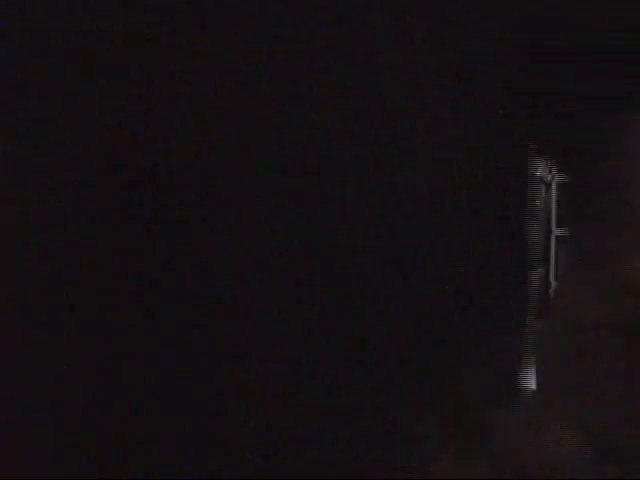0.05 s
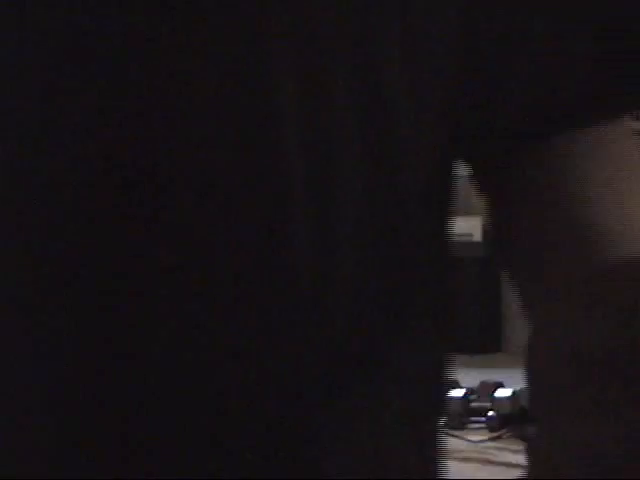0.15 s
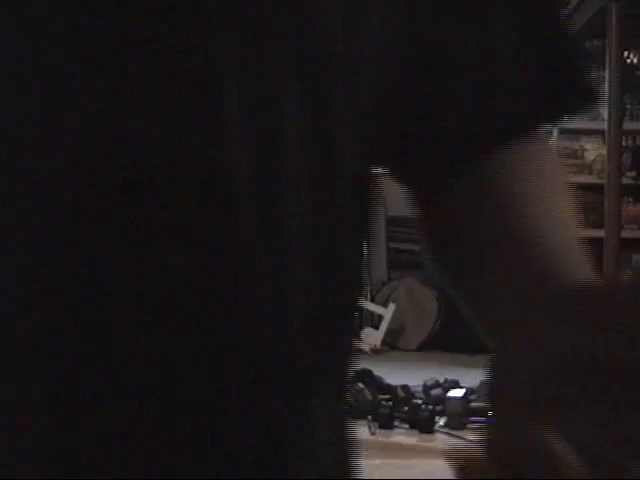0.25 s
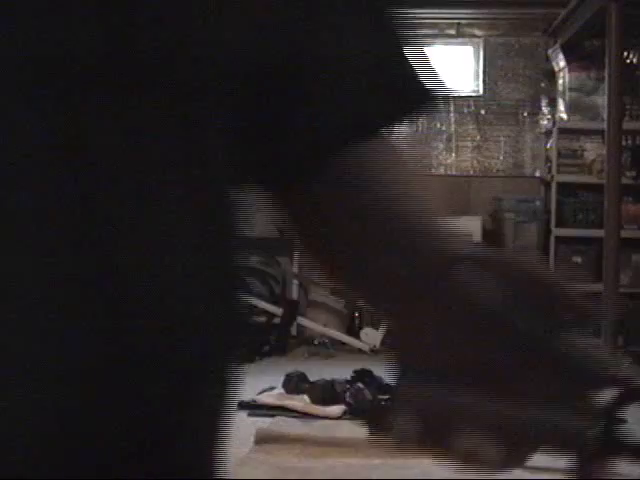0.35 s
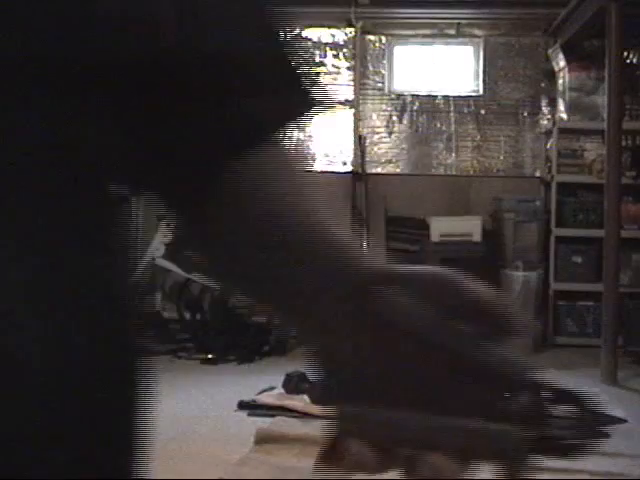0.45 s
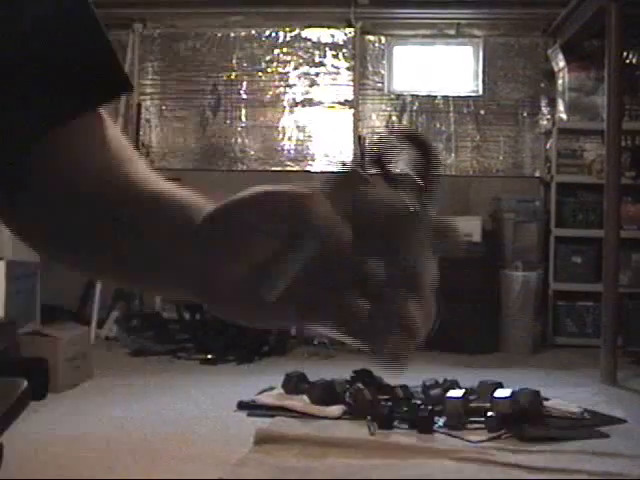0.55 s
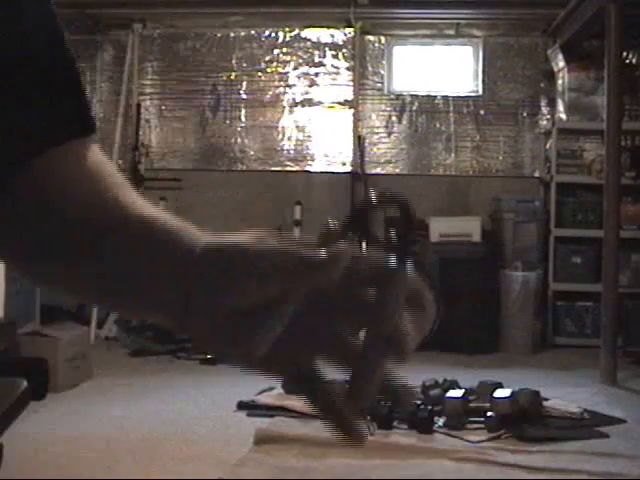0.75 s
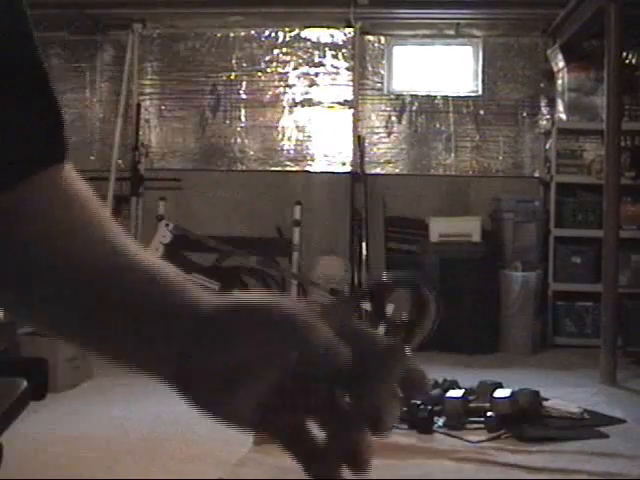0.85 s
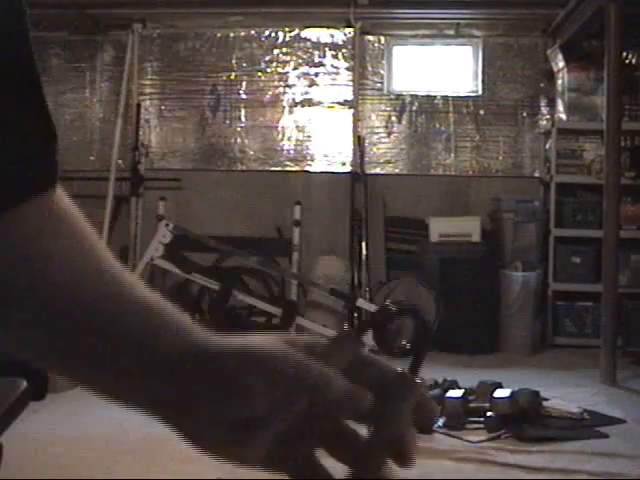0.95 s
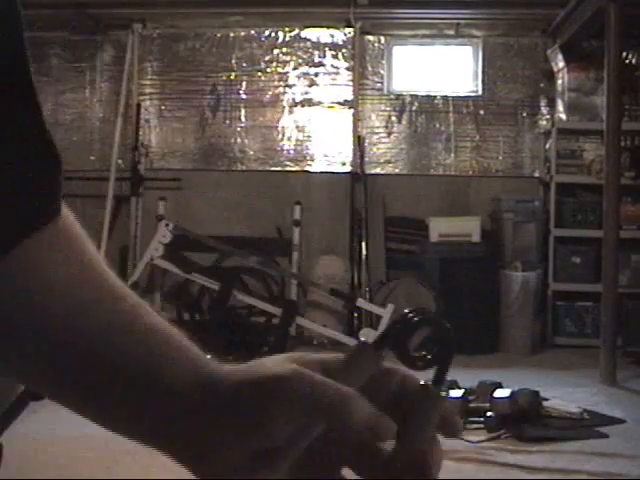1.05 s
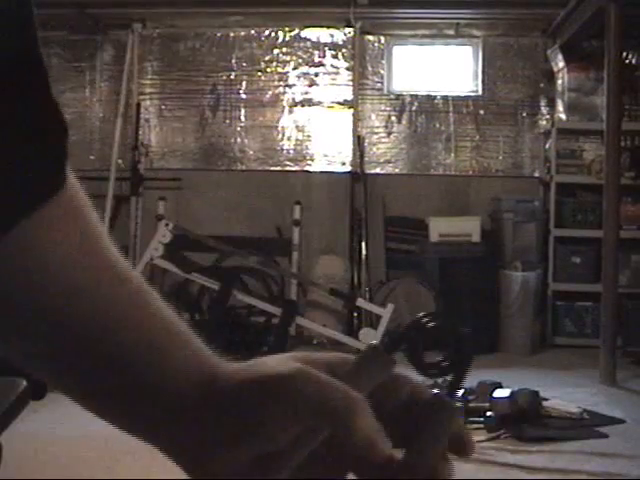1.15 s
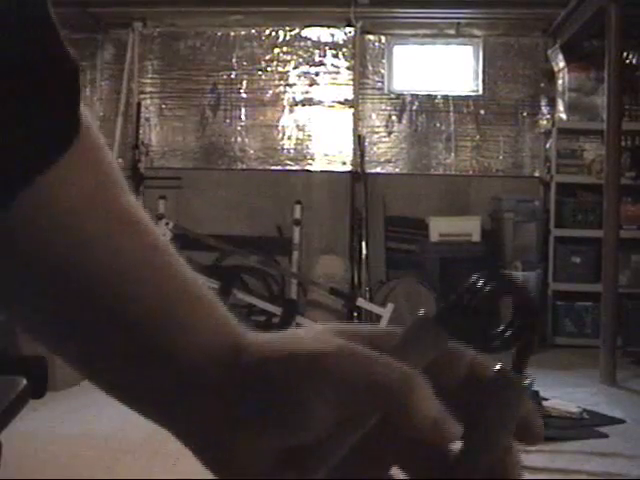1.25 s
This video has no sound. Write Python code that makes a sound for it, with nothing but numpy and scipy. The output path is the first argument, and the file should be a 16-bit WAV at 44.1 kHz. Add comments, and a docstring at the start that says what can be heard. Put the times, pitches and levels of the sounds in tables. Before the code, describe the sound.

A camera body is bumped twice right at the microphone at about 0.2 seconds, a light knock followed at once by a heavier one. Each is a hollow thud with a short clatter, dying quickly in a quiet basement. Around 1.2 to 1.3 seconds a hand rubs softly on a hand gripper, which ticks and snaps faintly. Soft hiss, electrical hum and a thin motor whine continue throughout.

```python
"""Mains hum, a thin motor whine and soft hiss sound throughout in a quiet basement.
At 0.2 s the camera body is bumped close by: a light knock, then a heavier one 70 ms later.
In each, the close modes of the hollow body beat in a thud, under a short clatter and the ring
of the casing; the room reverberates briefly. From about 1.2 s a hand shifts on a hand gripper
with soft rubs, and the gripper ticks and snaps faintly."""
import sys
import numpy as np
from scipy import signal
from scipy.fft import irfft
from scipy.io import wavfile

SR = 44100
rng = np.random.default_rng(int(sys.argv[2]) if len(sys.argv) > 2 else 0)


def waveform_to_disk(signal):
    """Save audio, clipped to [-1, 1], as 16-bit WAV at the path in sys.argv[1]."""
    frames = np.transpose(np.atleast_2d(signal))
    scaled = np.clip(frames, -1, 1) * 32767
    samples = np.round(scaled).astype(np.int16)
    wavfile.write(sys.argv[1], SR, samples)


N = 57330
TIME = np.arange(N) / SR
FREQS = np.maximum(np.arange(N // 2 + 1) * SR / N, 1)


def from_db(db):
    """Amplitude ratio of a level in decibels."""
    return 10 ** (np.asarray(db) / 20)


def at_hz(points, hz):
    """Interpolation of a table along log frequency."""
    frequencies, values = np.transpose(points)
    return np.interp(np.log(hz), np.log(frequencies), values)


def noise(gain):
    """Random-phase noise of unit rms with the given amplitude spectrum."""
    x = irfft(gain * np.exp(2j * np.pi * rng.random(len(FREQS))), N)
    return x / np.sqrt(np.mean(x ** 2) + 1e-20)


def band_noise(hz, octaves):
    """Noise in a Gaussian band whose width is a standard deviation in octaves."""
    return noise(np.exp(-0.5 * (np.log2(FREQS / hz) / octaves) ** 2))


def since(onset):
    """Time elapsed after an onset, zero before it."""
    return np.maximum(TIME - onset, 0)


def struck(onset, rise, t60):
    """Envelope of a damped vibration: exponential rise and decay."""
    age = since(onset)
    return (1 - np.exp(-age / rise)) * from_db(-60 * age / t60)


def swell(onset, peak_s, t60):
    """Gamma envelope: a gradual rise to 1, then a decay that tends to 60 dB per t60."""
    age = since(onset) / peak_s
    return (age * np.exp(1 - age)) ** (peak_s * np.log(1000) / t60)


def ripple_db():
    """Spectral ripple: random narrow peaks and dips, fading out below about 1100 Hz."""
    knots_hz = np.arange(600) * 45
    ripple = 3.5 * np.interp(FREQS, knots_hz, rng.standard_normal(len(knots_hz)))
    return ripple * FREQS / (FREQS + 1100)


# Light and heavy knock: (time [s], level [dB], stretch of the modes' time scale [ratio])
IMPACTS = [(0.2005, 0, 0.72), (0.2718, -0.5, 1)]
# Modes of the hollow camera body: (frequency [Hz], relative level in the light knock [dB],
# in the heavy knock [dB], unstretched time to peak [s], unstretched t60 [s])
BODY_MODES = [(134.8, -38.5, -32, 0.025, 0.13), (170.6, -33.5, -34.5, 0.033, 0.042),
              (211.3, -44, -19.5, 0.037, 0.043), (239.8, -33, -17.5, 0.04, 0.038),
              (299.9, -31, -19, 0.037, 0.12), (317, -19.5, -16.5, 0.0564, 0.011),
              (366.2, -26, -8.5, 0.024, 0.13), (391.6, -34, -20, 0.042, 0.1),
              (422.7, -22, -18, 0.037, 0.137), (529.7, -34, -24, 0.015, 0.085),
              (582.6, -21, -28.5, 0.028, 0.12), (620.2, -24, -28, 0.046, 0.031),
              (653, -26.5, -30.5, 0.029, 0.15), (727.7, -27.5, -25.5, 0.023, 0.08),
              (771, -56, -26, 0.015, 0.094), (942, -37.5, -35.5, 0.035, 0.039)]


def thuds():
    """Modal superposition: the hollow body's close modes, alternating in sign, swell and beat."""
    out = np.zeros(N)
    for knock, (onset, db, stretch) in enumerate(IMPACTS):
        for k, (hz, *mode_db, peak_s, t60) in enumerate(BODY_MODES):
            envelope = from_db(db + mode_db[knock]) * swell(onset, peak_s * stretch, t60 * stretch)
            out += (-1) ** k * envelope * np.sin(2 * np.pi * hz * since(onset))
    return out


# Dull bumps within the knocks: (time [s], level [dB], centre frequency [Hz], t60 [s])
SOFT_CONTACTS = [(0.211, -16.5, 426, 0.047), (0.2345, -15, 530, 0.053), (0.274, -32, 614, 0.13),
                 (0.304, -28, 262, 0.22), (0.333, -24, 396, 0.11), (0.317, -35, 101, 0.14)]


def bumps():
    """Soft impact: a yielding contact excites mainly low frequencies, a dull, unpitched burst."""
    return sum(from_db(db) * band_noise(hz, octaves=0.35) * struck(onset, rise=0.0016, t60=t60)
               for onset, db, hz, t60 in SOFT_CONTACTS)


# Contacts of hard parts: (time [s], level [dB], t60 [s], relative gain of the low shelf [dB])
HARD_CONTACTS = [(0.1991, -30, 0.043, -7.5), (0.2012, -29, 0.088, -19), (0.215, -36, 0.12, 3),
                 (0.245, -53, 0.021, -17), (0.2736, -24.5, 0.047, 2), (0.2774, -17.5, 0.059, -9),
                 (0.2894, -15.5, 0.093, 3), (0.3062, -28.5, 0.038, -8)]
# Spectrum of the clatter: (frequency [Hz], relative spectral level [dB])
CLATTER_SPECTRUM = [(90, -48), (250, 5), (800, 6.5), (1000, -8.5), (1400, 6), (1900, -3), (2500, -3),
                    (3200, -1), (3700, -5.5), (4200, 1), (4500, -11), (5600, -15), (6100, -17),
                    (7800, -11.5), (8400, -24), (10000, -25.5), (10700, -19), (14000, -24), (16000, -37)]
SHELF_HZ = 2650


def clatter():
    """Modal overlap: each hard contact excites resonances so crowded that they merge into noise."""
    colour_db = at_hz(CLATTER_SPECTRUM, FREQS) + 0.21 * ripple_db()
    low_shelf = 1 / (1 + (FREQS / SHELF_HZ) ** 10)
    out = np.zeros(N)
    for onset, db, t60, shelf_db in HARD_CONTACTS:
        burst = noise(from_db(colour_db + shelf_db * low_shelf))
        out += from_db(db) * burst * struck(onset, rise=0.00042, t60=t60)
    return out


# Modes of the camera's casing: (frequency [Hz], relative level in the light knock [dB],
# in the heavy knock [dB], unstretched t60 [s])
CASING_MODES = [(1129, -32, -30.5, 0.15), (1283, -38, -28.5, 0.2), (1430, -61, -27, 0.065),
                (1620, -45, -34, 0.23), (2144, -64, -25.5, 0.073), (2627, -28, -36, 0.057),
                (2863, -32, -33, 0.045), (3153, -47, -22.5, 0.076), (3268, -25, -47, 0.044),
                (3570, -53, -39, 0.043), (4015, -57, -21, 0.055), (4138, -44, -26, 0.062),
                (4350, -35, -29.5, 0.042), (4820, -41, -42, 0.06), (5620, -53, -26.5, 0.06),
                (5730, -33, -30, 0.039), (7270, -33, -48, 0.035), (7730, -32, -31, 0.027)]
CLACK_DELAY_S, REBOUND_S, REBOUND_DB = 0.0019, 0.0149, -10


def clacks():
    """Damped free vibration: the casing rings at each knock and again, weaker, on the rebound."""
    out = np.zeros(N)
    for knock, (onset, db, stretch) in enumerate(IMPACTS):
        for delay, strike_db in ((CLACK_DELAY_S, 0), (CLACK_DELAY_S + REBOUND_S, REBOUND_DB)):
            for hz, *mode_db, t60 in CASING_MODES:
                envelope = struck(onset + delay, rise=0.0016, t60=t60 * stretch)
                mode = np.sin(2 * np.pi * (hz * TIME + rng.random()))
                out += from_db(db + strike_db + mode_db[knock]) * envelope * mode
    return out


# Dry ticks of the gripper: (time [s], level [dB], centre frequency [Hz], width [octaves], t60 [s])
GRIPPER_TICKS = [(1.2648, -24, 12300, 0.16, 0.0032), (1.2730, -29.5, 9050, 0.61, .005),
                 (1.2972, -31, 8040, 1, 0.0053)]


def ticks():
    """Impulsive excitation: tiny, abrupt contacts give a few milliseconds of treble noise."""
    return sum(from_db(db) * band_noise(hz, width) * struck(onset, rise=0.00012, t60=t60)
               for onset, db, hz, width, t60 in GRIPPER_TICKS)


# Snaps of the shifting handle: (time [s], level [dB], frequency [Hz])
HANDLE_SNAPS = [(1.2736, -20, 2500), (1.2775, -25, 2900), (1.2885, -26, 2400), (1.2972, -20.5, 2000)]


def snaps():
    """Damped oscillation: each snap is a single mode that dies within a few cycles."""
    out = np.zeros(N)
    for onset, db, hz in HANDLE_SNAPS:
        envelope = struck(onset, rise=0.00029, t60=0.0033)
        out += from_db(db) * envelope * np.sin(2 * np.pi * hz * since(onset))
    return out


# Rubs of the hand: (peak time [s], half-length [s], level [dB], centre frequency [Hz], width [octaves])
HAND_RUBS = [(1.175, 0.038, -52, 454, 0.17), (1.233, 0.075, -54.5, 256, 0.57),
             (1.284, 0.026, -48, 2250, 0.55), (1.288, 0.018, -58, 10000, .5)]


def rubs():
    """Sliding friction: the shifting hand makes bands of noise that swell and fade."""
    return sum(from_db(db) * band_noise(hz, width) * np.exp(-((TIME - peak) / half_length) ** 2)
               for peak, half_length, db, hz, width in HAND_RUBS)


# Reverberation time of the basement: (frequency [Hz], t60 [s])
BASEMENT_DECAY = [(300, 0.16), (1500, 0.17), (4000, 0.12), (14000, 0.21)]


def basement(x):
    """Reverberation: dense reflections build up and die away, each octave at its own rate."""
    response = np.zeros(N)
    for hz in 125 * 2.0 ** np.arange(8):
        envelope = struck(0, rise=0.0085, t60=at_hz(BASEMENT_DECAY, hz))
        response += np.sqrt(hz) * band_noise(hz, octaves=0.46) * envelope
    return signal.fftconvolve(x, response / np.sqrt(np.sum(response ** 2)))[:N]


# Partials of the mains hum and motor whine: (frequency [Hz], rms level [dB])
HUM_PARTIALS = [(86.2, -66), (119, -61), (174.4, -65), (239.8, -49.5), (299.6, -68.5), (359.8, -57),
                (473, -66), (523.5, -62.5), (1570.4, -49), (8985, -78), (10180, -69.5), (10778, -74.5),
                (11379, -70), (11978, -74.5)]
WAVER_DEPTH, WAVER_HZ = 0.043, 7.2


def hum_and_whine():
    """Periodic vibration: mains and motor give steady tones with slight random amplitude modulation."""
    out = np.zeros(N)
    for hz, db in HUM_PARTIALS:
        waver = 1 + WAVER_DEPTH * band_noise(WAVER_HZ, octaves=0.26)
        out += np.sqrt(2) * from_db(db) * waver * np.sin(2 * np.pi * (hz * TIME + rng.random()))
    return out


# Noise floor of room and camera: (frequency [Hz], relative spectral level [dB])
HISS_SPECTRUM = [(25, 0), (110, 1), (200, -10), (400, -3.5), (630, -0.5), (740, 4), (860, 4.5), (920, 0.5),
                 (1150, -1.5), (1280, 4.5), (1360, -3), (1480, 4.5), (1650, -2), (1800, 4), (2000, -2.5),
                 (2500, -5.5), (4000, -10.5), (5300, -15), (6600, -14), (7600, -10.5), (9000, -16),
                 (13000, -18), (15000, -26.5), (16000, -43)]
HISS_RMS_DB = -47


def hiss():
    """Stationary noise: a soft floor with a finely rippled spectrum."""
    return from_db(HISS_RMS_DB) * noise(from_db(at_hz(HISS_SPECTRUM, FREQS) + ripple_db()))


def scene():
    """Superposition: the knocks and their reverberation add to the handling and the background."""
    thud, rattle, ring = thuds() + bumps(), clatter(), clacks()
    room = basement(from_db(-7.5) * thud + from_db(-10) * rattle + from_db(-9.5) * ring)
    low_cut = signal.butter(2, 98, "high", fs=SR, output="sos")  # the knocks carry no deep bass
    knocks = signal.sosfilt(low_cut, thud + rattle + ring + room)
    handling = ticks() + snaps() + rubs()
    background = hiss() + hum_and_whine()
    return (knocks + handling + background)[None]


def record(dry, stopband_hz=16365):
    """Band limiting: a steep low-pass filter removes the highest treble."""
    low_pass = signal.cheby2(16, 60, stopband_hz, fs=SR, output="sos")
    return signal.sosfilt(low_pass, dry)


dry = scene()
out = record(dry)
waveform_to_disk(out)
```